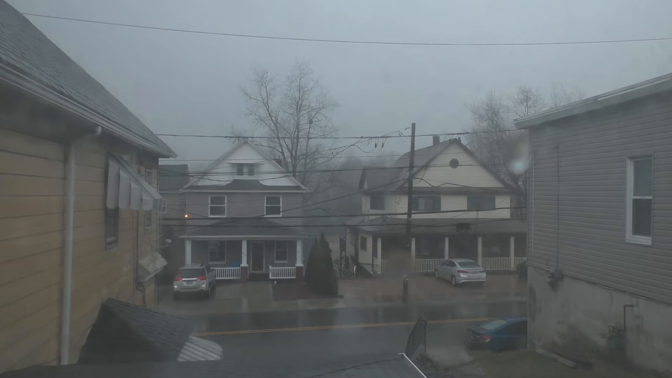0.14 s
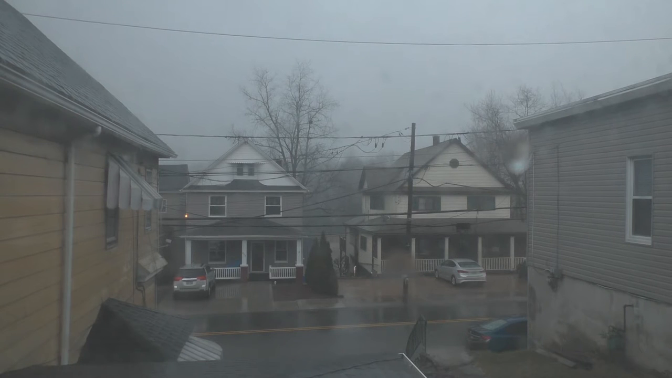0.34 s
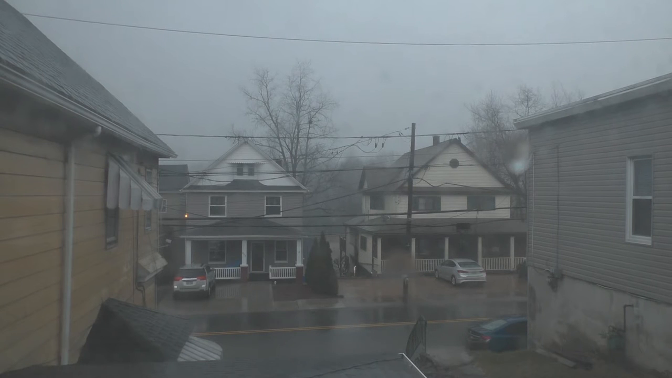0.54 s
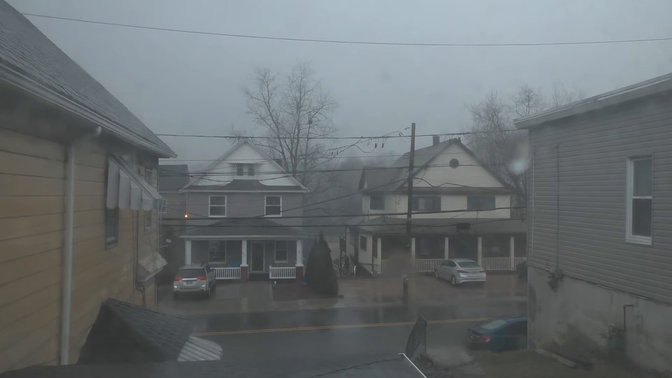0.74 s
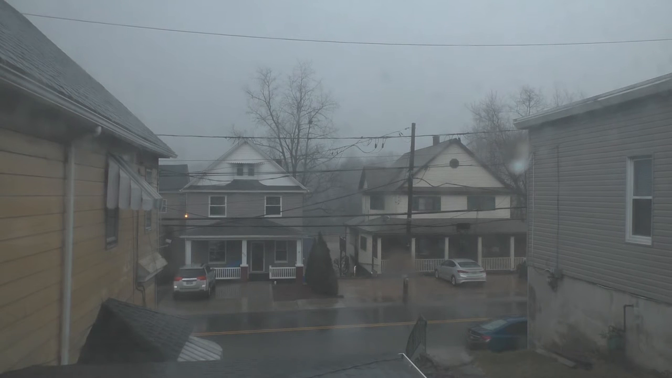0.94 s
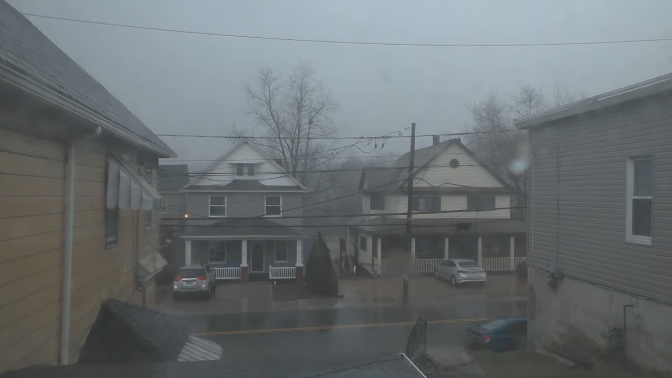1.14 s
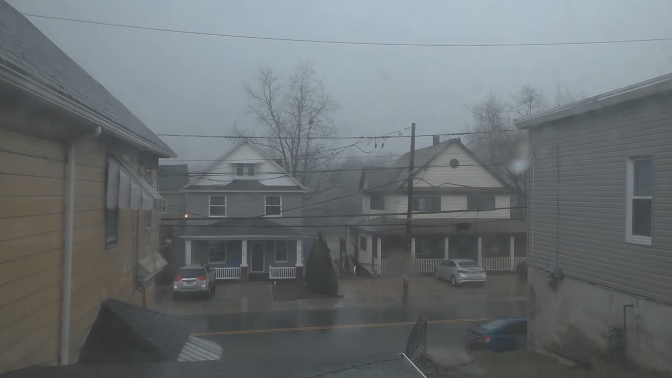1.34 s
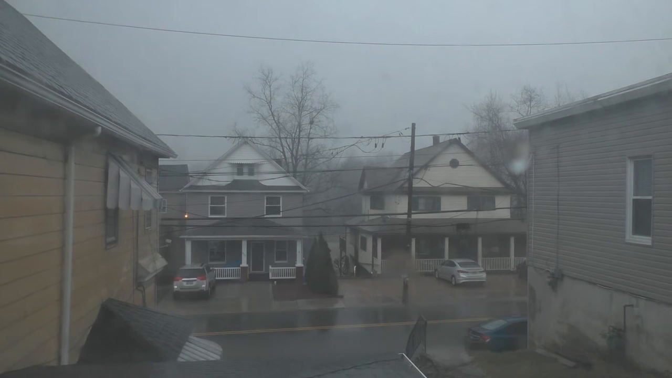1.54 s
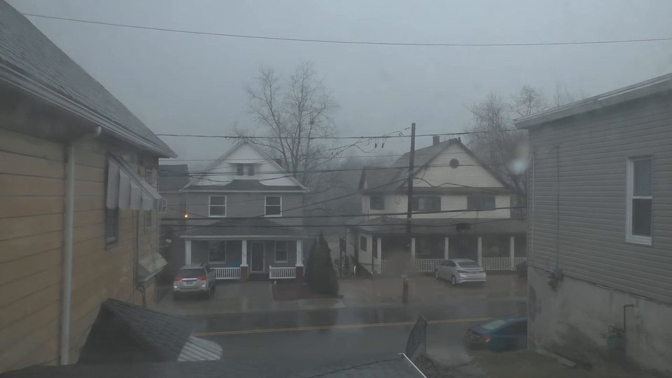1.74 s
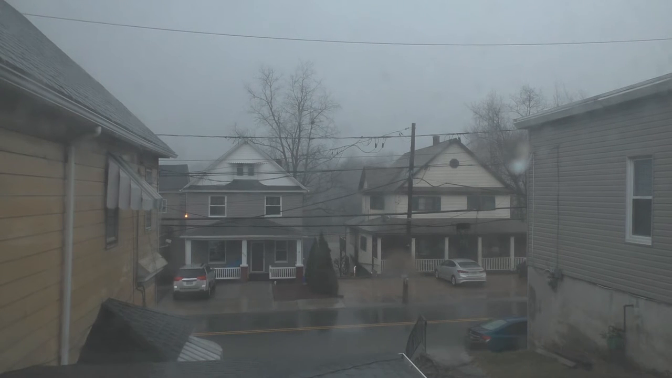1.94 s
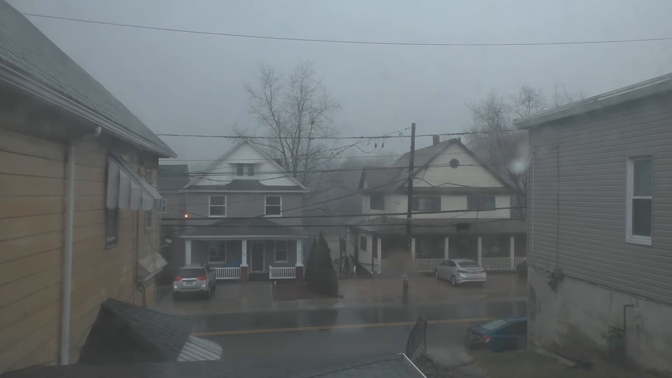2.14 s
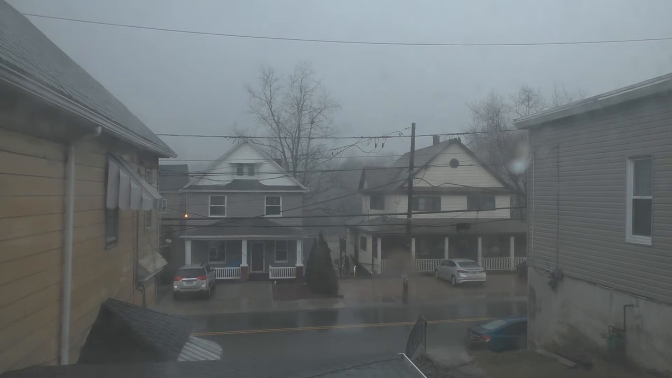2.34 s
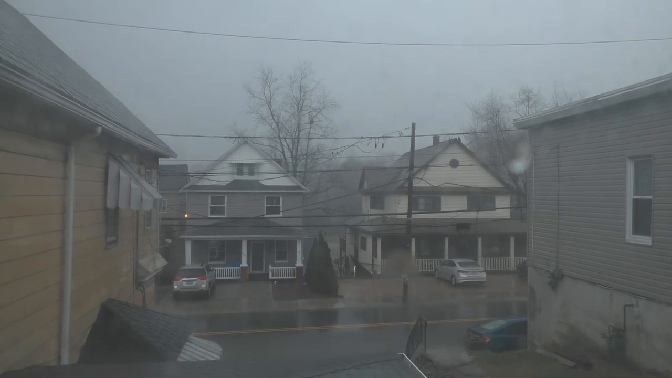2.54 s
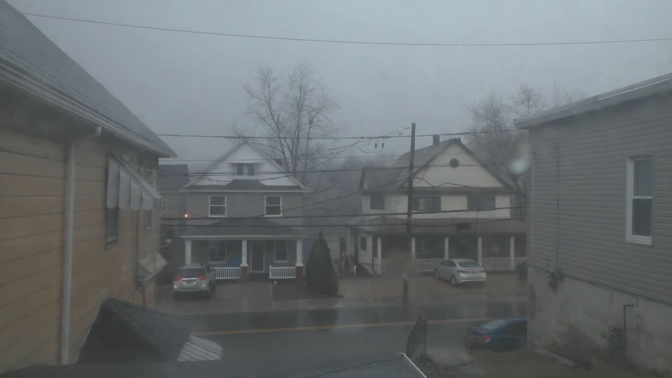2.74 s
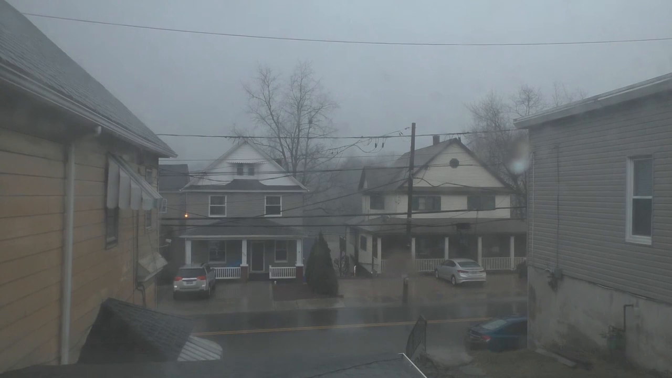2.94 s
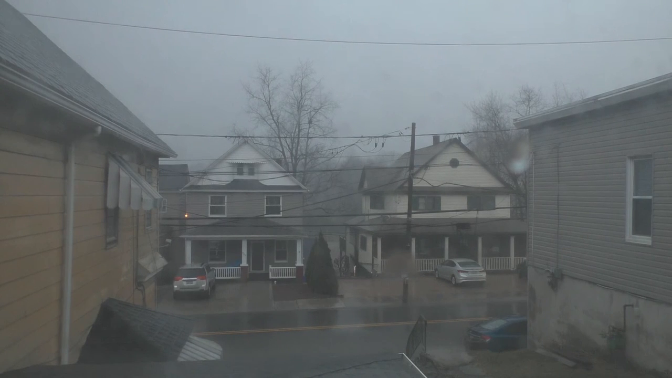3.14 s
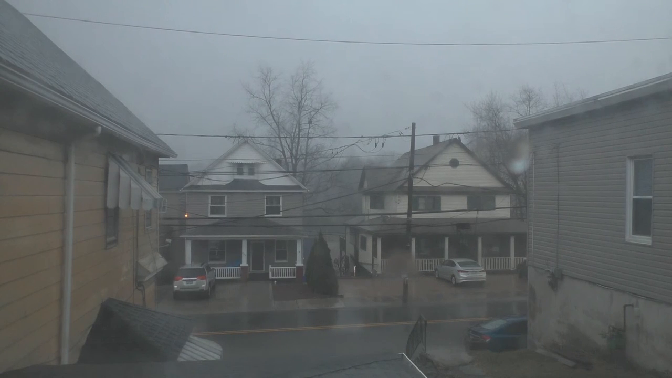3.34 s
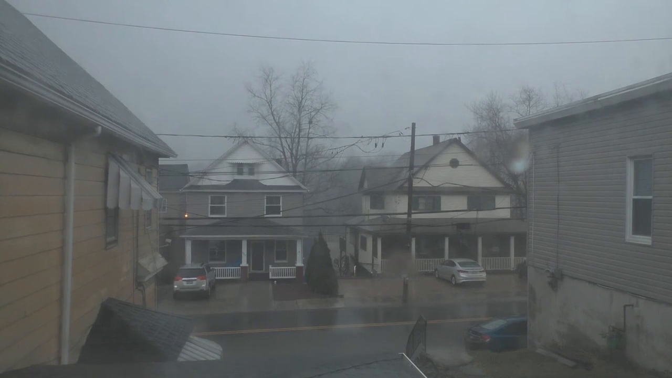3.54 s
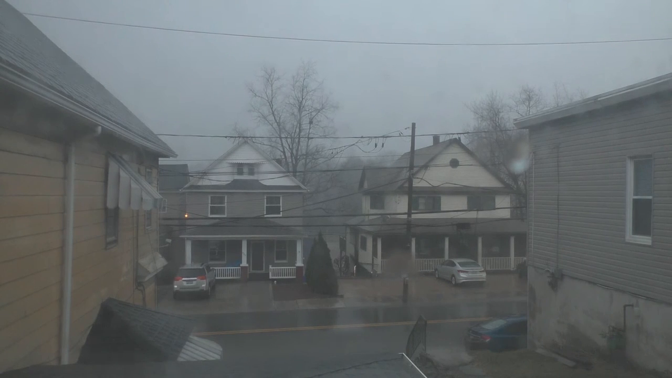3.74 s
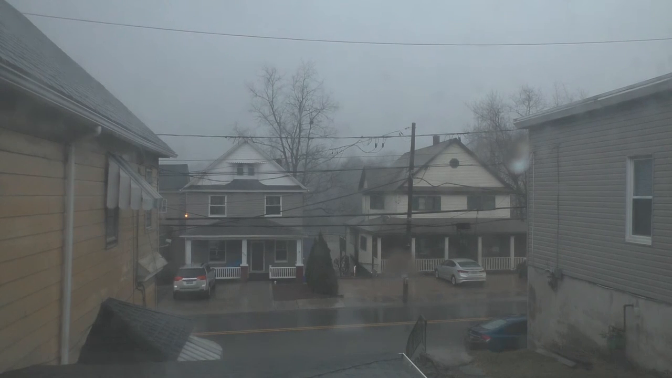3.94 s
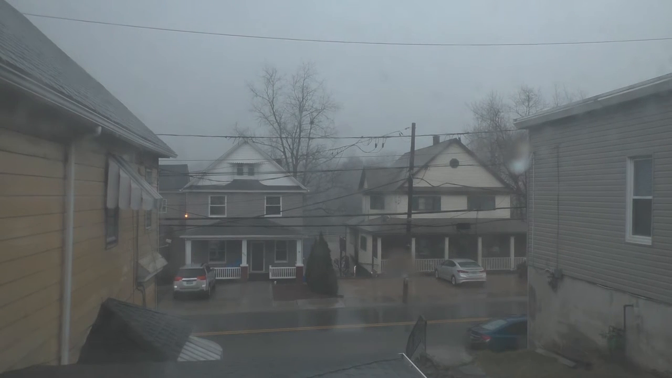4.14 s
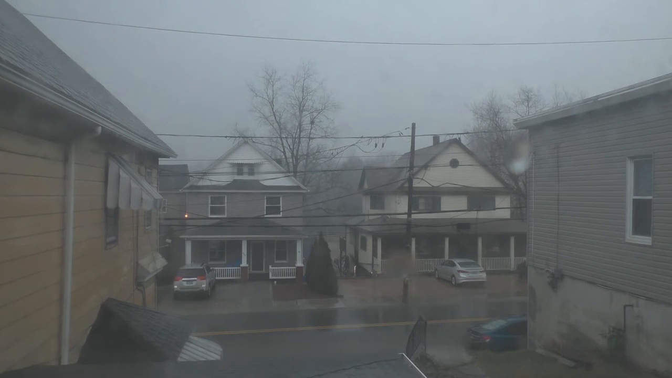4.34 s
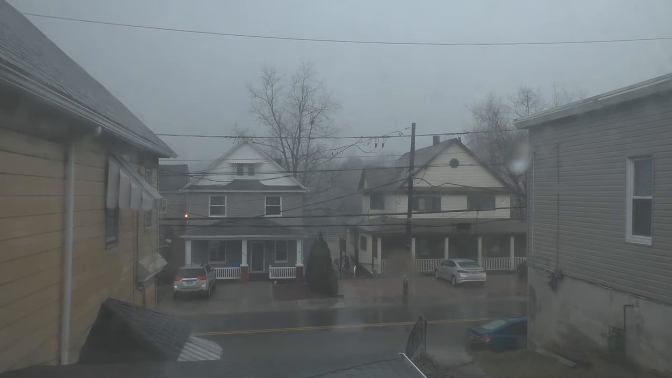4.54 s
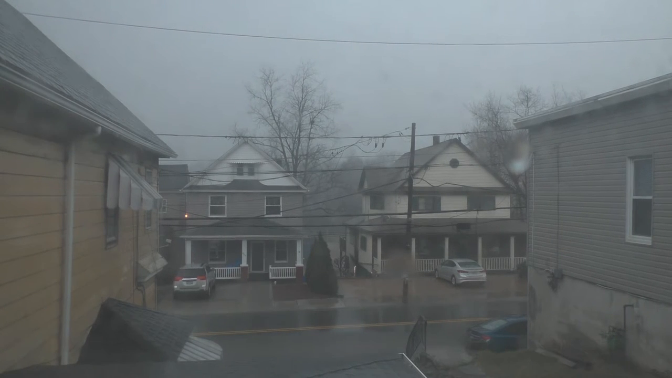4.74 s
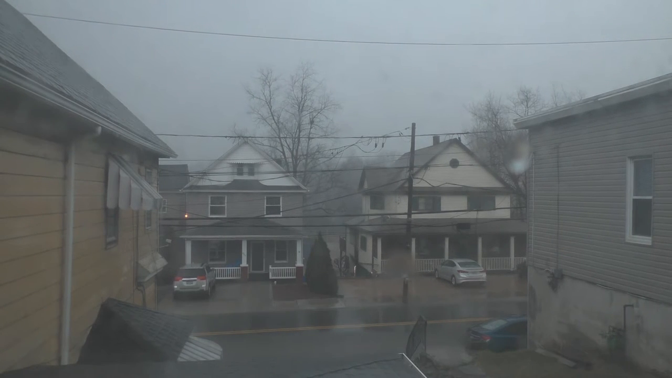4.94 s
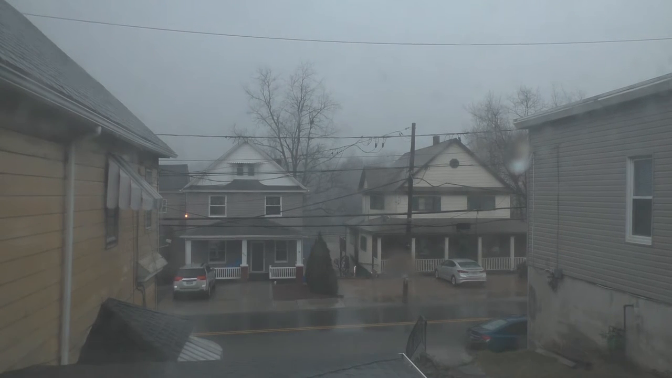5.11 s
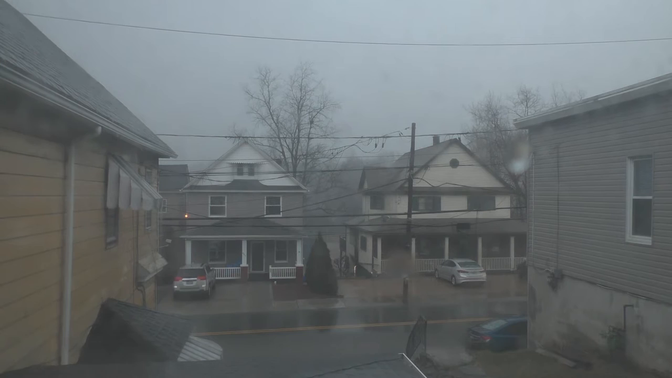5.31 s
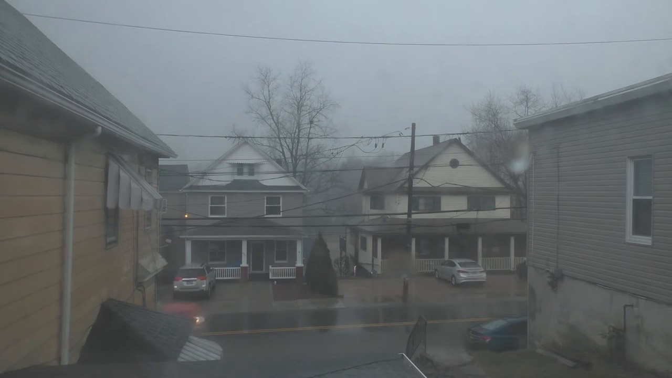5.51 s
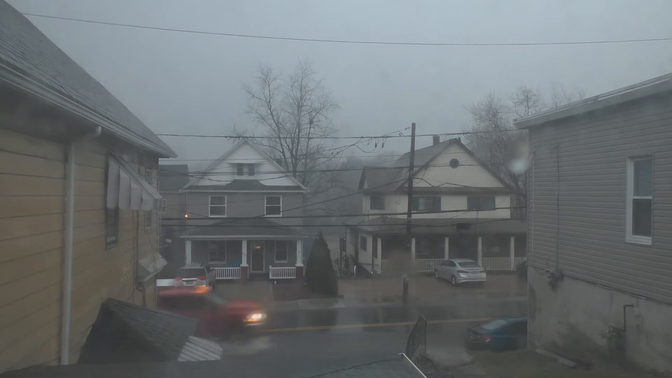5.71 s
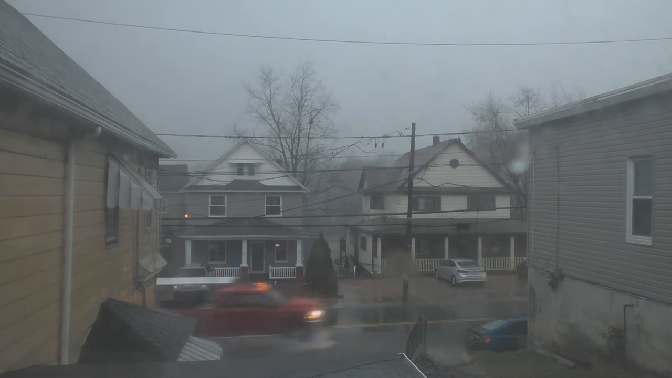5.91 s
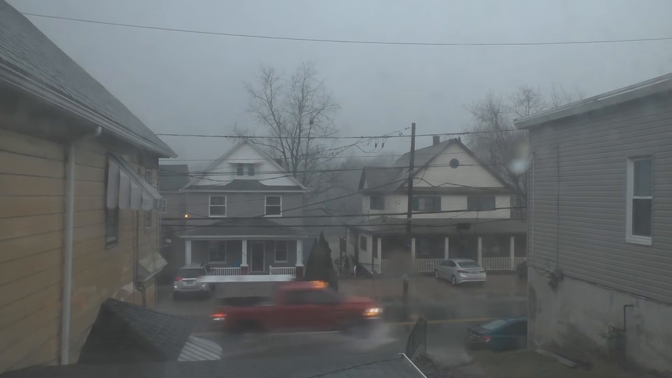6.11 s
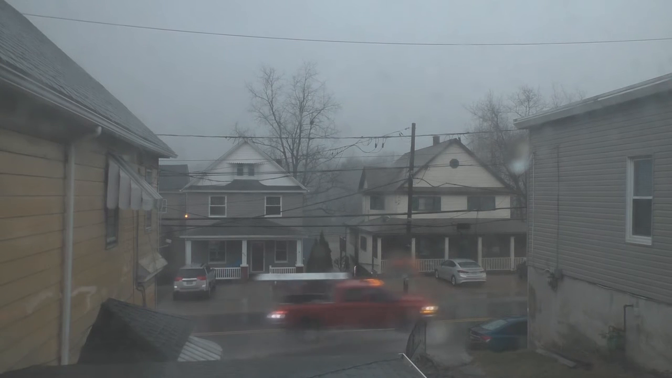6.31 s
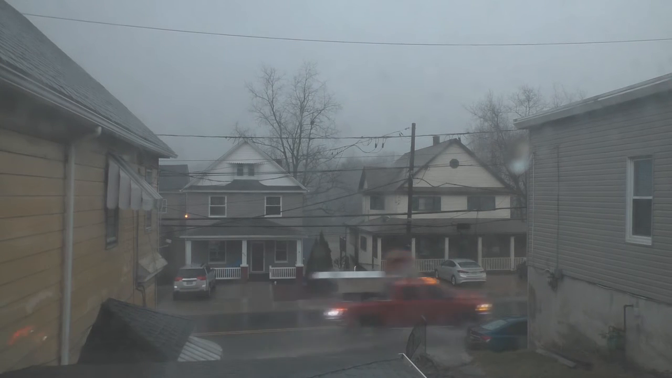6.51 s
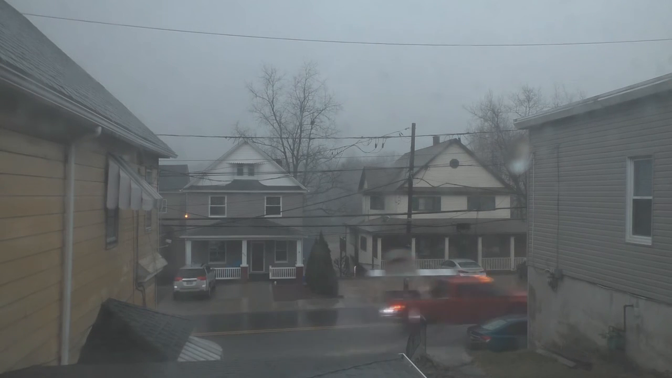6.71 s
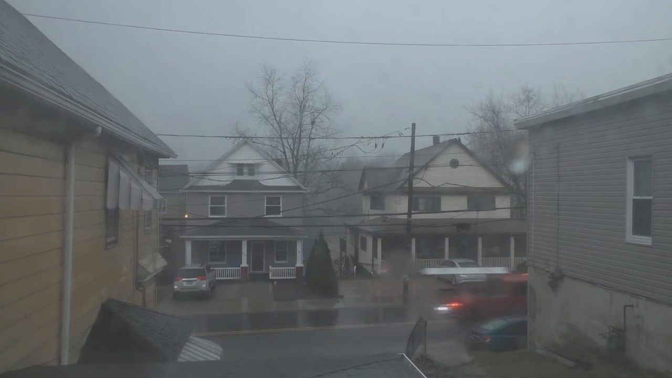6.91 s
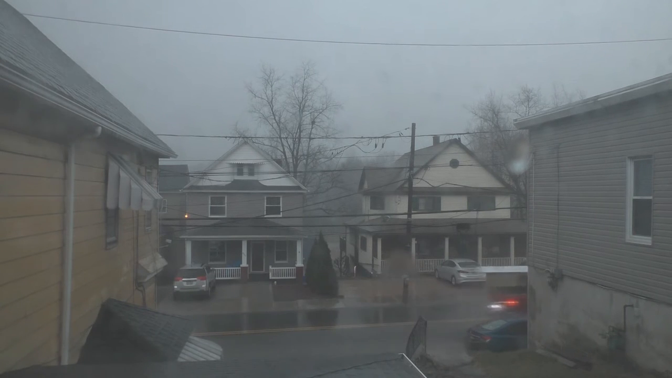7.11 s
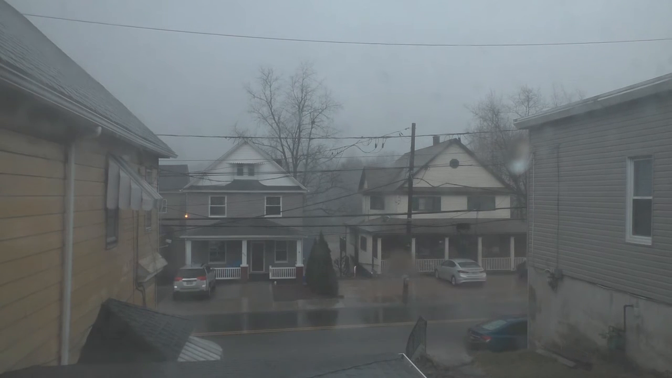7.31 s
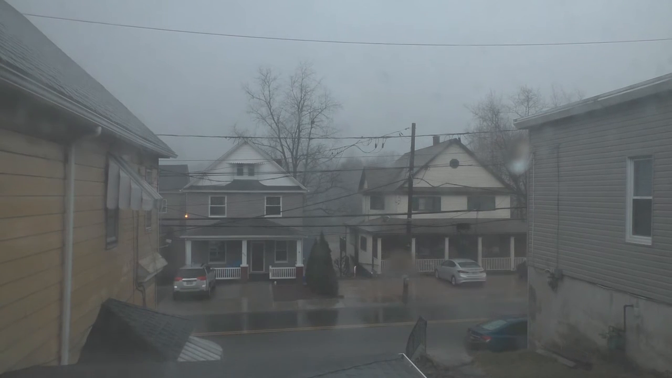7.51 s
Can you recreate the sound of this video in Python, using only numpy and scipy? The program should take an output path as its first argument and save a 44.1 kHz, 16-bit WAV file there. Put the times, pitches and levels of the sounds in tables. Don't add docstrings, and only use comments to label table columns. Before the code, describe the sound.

Heard from an upper window in steady rain, with drops plinking on sill and gutter. A distant pickup's low, rough engine drone swells and fades off the house fronts, slowly growing. After about five seconds it rounds into view with small tyre squeaks, spray hiss and a strong growl, a loose panel rattling metallically as it crosses. It ends still close, with a hollow exhaust note. Stereo, fixed position.

```python
import sys
import numpy as np
from scipy import signal
from scipy.fft import rfft, irfft, next_fast_len
from scipy.io import wavfile
from scipy.ndimage import uniform_filter1d

SR = 44100
rng = np.random.default_rng(int(sys.argv[2]) if len(sys.argv) > 2 else 0)


def log_audio(samples):
    frames = np.atleast_2d(samples).T
    limited = np.clip(frames, -1, 1)
    pcm = np.round(limited * 32767).astype(np.int16)
    wavfile.write(sys.argv[1], SR, pcm)


def nominal_scale(level):
    x = np.asarray(level, float) / 20
    return 10 ** x


N = 333396

# order, level re engine/dB
STRONG_ORDERS = [(6, 4.5), (9, 3.5), (10, 0.5), (11, -1.5), (12, 5), (13, 4.5), (15, -5), (17, -10),
                 (19, -12.5), (21, -12), (14, -8.5), (16, -14), (18, -13), (20, -12.5), (22, -15),
                 (23, -17.5), (26, -19)]


def evened(x):
    return x / np.sqrt(np.mean(x ** 2) + 1e-20)


def read(points, hz):
    f, value = np.transpose(points)
    return np.interp(np.log(hz + 1), np.log(f + 1), value)


def curves(rows, t):
    s, *columns = np.transpose(rows)
    return [np.interp(t, s, c) for c in columns]


def drift(t, top_hz):
    hz = np.geomspace(top_hz / 10, top_hz, num=12)
    return evened(sum(np.sin(2 * np.pi * (f * t + rng.random())) / np.sqrt(f) for f in hz))


def swell(t, middle_s, length_s):
    return np.cos(np.pi * np.clip((t - middle_s) / length_s, -.5, .5)) ** 2


def add_at(out, s, sound):
    start = round(s * SR)
    out[..., start:start + sound.shape[-1]] += sound


def resonate(x, hz, width_hz):
    turn = np.exp(2j * np.pi * np.cumsum(hz * np.ones(len(x))) / SR)
    r = np.exp(-np.pi * width_hz / SR)
    return 2 * (turn * signal.lfilter([1 - r], [1, -r], x / turn)).real


def narrowed(x, hz, width_hz):
    return evened(resonate(resonate(x, hz, width_hz), hz, width_hz))


def band(rows, db, hz, width_hz):
    t, out = np.arange(N) / SR, np.zeros(N)
    fade = np.clip(np.minimum(t - rows[0][0], rows[-1][0] + 0.08 - t) / 0.08, 0, 1)
    on = fade > 0
    out[on] = narrowed(rng.standard_normal(on.sum()), hz[on], width_hz)
    return nominal_scale(db) * fade * out


def hiss(size, field_db, patchy_db, flicker_db, streak_db, focus=1):
    # f/Hz, likeness (-1 to 1)
    likeness = [(40, 0.42), (90, 1), (250, 0.78), (600, 0.54), (850, -0.22), (1050, -0.067), (1400, 0.21),
                (1900, 0.072), (2300, 0.04), (2950, 0.48), (3480, 0.27), (4300, 0.086), (5000, 0.37),
                (7000, 0.94), (10000, 0.45), (15000, 0.29)]
    # f/Hz, phase/rad
    ahead = [(1200, -0.14), (1420, -0.5), (1900, 0.14), (2300, -1.2), (2950, 2), (3500, 0.44), (4100, 0)]
    hop = size // 4
    frames, hz = N // hop + 5, np.fft.rfftfreq(size, 1 / SR)[:, None]
    noise = rng.standard_normal((6, frames, len(hz)), dtype=np.float32)
    a, b, c, d, patches, streaks = noise.transpose(0, 2, 1)
    patches = evened(uniform_filter1d(uniform_filter1d(patches, size=10, axis=0), size=20, axis=1))
    streaks = evened(uniform_filter1d(streaks, size=26, axis=1))
    flicker = evened(uniform_filter1d(rng.standard_normal(frames), size=8))
    flicker = flicker * np.clip(hz / 7000, 0, 1) * np.clip((16000 - hz) / 7000, .4, 1)
    same = np.clip(focus * read(likeness, hz), -1, 1)
    left = a + 1j * b
    right = same * np.exp(1j * read(ahead, hz)) * left + np.sqrt(1 - same ** 2) * (c + 1j * d)
    z = np.array([left, right])
    chance_db = patchy_db * patches + streak_db * streaks + flicker_db * flicker
    z *= nominal_scale(field_db(hz, np.arange(frames) * hop / SR) + chance_db)
    return signal.istft(z, nperseg=size, noverlap=size - hop)[1][:, :N]


def rain():
    # f/Hz, density/dB per Hz
    rain_spectrum = [(240, -40), (400, 9), (633, -26), (988, -23), (1030, -11), (1210, -12), (1560, -34),
                     (1710, -13.5), (5090, -22.5), (7570, -25.5), (15600, -28)]

    def field_db(hz, s):
        return read(rain_spectrum, hz) + 0.18 * drift(s, 2.6)

    wash = evened(hiss(size=512, field_db=field_db, patchy_db=1.5, flicker_db=0.0, streak_db=1.0))
    t, patter = np.arange(300) / SR, np.zeros((2, N))
    count = 45 * N // SR
    for hz in np.geomspace(1500, 10500, num=14):
        grain = np.sin(2 * np.pi * hz * t) * np.exp(-t * hz / 4.6) * nominal_scale(read(rain_spectrum, hz)) * hz
        size = np.zeros((2, N))
        size_db = 4.4 * np.minimum(rng.exponential(1, (2, count)), 4)
        np.put_along_axis(size, rng.integers(0, N, (2, count)), nominal_scale(size_db), axis=1)
        patter += signal.oaconvolve(size, grain[None], axes=1)[:, :N]
    return nominal_scale(-53.5) * (wash + nominal_scale(-14.0) * evened(patter + 0.5 * patter[::-1]))


def ticks():
    # t/s, peak level/dB, f/Hz
    tick_drops = [(.8066, -47, 4050), (2.1026, -42, 2450), (2.3715, -42, 4000), (2.378, -44, 5300),
                  (2.4927, -41, 3460), (2.8818, -41, 2550), (2.921, -42, 4100), (3.0131, -46, 2100),
                  (3.409, -47, 5650), (3.6017, -43, 2240), (3.8801, -42, 2370), (4.2597, -45, 3600)]
    t60_s = 0.041
    t, out = np.arange(2600) / SR, np.zeros(N + 2600)
    for s, db, hz in tick_drops:
        note = np.sin(2 * np.pi * hz * t * (1 + 1.5 * t))
        add_at(out, s, nominal_scale(db - 60 * t / t60_s) * np.minimum(t / .002, 1) * note)
    return out[:N]


def drops():
    # t/s, peak level/dB, f/Hz
    near_drops = [(0.3025, -37, 4990), (0.5394, -43, 3800), (1.3894, -44, 5370), (1.5894, -37, 4820),
                  (1.7429, -42, 3890), (1.8794, -46, 4080), (2.3723, -33, 4700), (2.882, -32, 3550),
                  (3.4094, -39, 5680), (3.879, -35, 3800), (4.2592, -34, 3960), (4.5994, -40, 5320),
                  (4.9891, -33, 5300), (5.28, -35, 4800), (5.4694, -37, 5570), (5.658, -30, 3760),
                  (7.241, -29, 4200)]
    t, out = np.arange(2600) / SR, np.zeros((2, N + 2600))
    for s, db, hz in near_drops:
        plink = narrowed(rng.standard_normal(len(t)), hz, 3200)
        add_at(out, s, plink * nominal_scale(db - 11.5 - 60 * t / 0.11) * np.minimum(t / 0.0015, 1))
    return out[:, :N]


def splashes():
    # t/s, peak level/dB
    near_splashes = [(0.3641, -43.5), (0.9163, -47), (1.0694, -49), (1.3478, -47), (1.4596, -42),
                     (1.5894, -49), (2.2694, -42), (2.3594, -49), (2.4894, -45), (2.8794, -48),
                     (3.0494, -47), (3.1193, -43), (3.4594, -46), (3.69, -44), (3.8794, -49), (4.383, -43),
                     (5.0, -43), (5.2894, -43), (5.6594, -45), (5.9794, -46), (7.2994, -45), (7.5194, -44)]
    t, out = np.arange(2600) / SR, np.zeros((2, N + 2600))
    for s, db in near_splashes:
        puff, other = rng.standard_normal((2, len(t)))
        splash = np.array([narrowed(v, 7000, 6500) for v in (puff, 0.6 * puff + 0.81 * other)])
        add_at(out, s, splash * nominal_scale(db - 7.5 - 60 * t / 0.11) * np.minimum(t / 0.0032, 1))
    return out[:, :N]


def tyres():
    # f/Hz, density/dB per Hz
    spray_spectrum = [(180, -27), (300, -7.5), (453, -19), (581, -15), (822, -21), (1490, -19.5),
                      (2530, -22.5), (2980, -23.5), (3400, -25.5), (4430, -28.5), (4980, -29), (14600, -52),
                      (15600, -84)]
    # t/s, level/dB
    spray_level = [(0, -56), (.45, -57), (1.2, -55), (2.1, -52), (4.9, -53), (5.3, -50.5), (5.45, -48.5),
                   (5.6, -44), (5.85, -41.5), (6.02, -41.5), (6.2, -46), (6.4, -43.5), (6.6, -44),
                   (6.85, -45), (7.1, -43.5), (7.25, -45.5), (7.56, -46)]
    # middle t/s, level/dB, length/s
    roars = [
        (4.3, 3, 1.2),
        (6.64, 4.5, 0.89),
        (7.265, 5.5, 0.87),
    ]

    def field_db(hz, s):
        level_db = curves(spray_level, s)[0]
        rise_db = level_db + 52
        front_db = 4.5 * swell(s, 5.46, 0.49)
        roar_db = -2 + sum(db * swell(s, middle_s, length_s) for middle_s, db, length_s in roars)
        high = np.clip((hz - 6000) / 1500, 0, 1)
        middle = np.clip((hz - 3000) / 1400, 0, 1) - high
        low = np.clip((1050 - hz) / 300, 0, 1)
        sizzle_db = 2.5 + front_db - (1 - 0.73) * rise_db
        fizz_db = 1 + .6 * front_db - (1 - 0.6) * rise_db
        return read(spray_spectrum, hz) + level_db + middle * sizzle_db + high * fizz_db + low * roar_db

    return nominal_scale(15) * hiss(size=512, field_db=field_db, patchy_db=-0.02, flicker_db=0.7, streak_db=1.2, focus=1.2)


def wheel_arches():
    # middle t/s, peak level/dB, length/s, centre f/Hz
    swishes = [
        (5.46, -58, .2, 5100),
        (6.306, -49, .2, 3800),
        (6.46, -47, .14, 3750),
        (6.605, -45, .12, 4080),
        (6.71, -41, 0.2, 3950),
        (6.97, -45, 0.16, 3860),
        (7.09, -47.5, .25, 3940),
    ]
    t, out = np.arange(SR // 2) / SR, np.zeros(N)
    for s, db, length_s, hz in swishes:
        water = narrowed(rng.standard_normal(len(t)), hz, 880)
        add_at(out, s - .25, nominal_scale(db) * swell(t, .25, length_s) * water)
    return out


def exhaust_pipe():
    # t/s, f/Hz, level/dB
    pipe_note = [(7.08, 650, -58), (7.26, 636, -52), (7.31, 645, -38), (7.38, 655, -37), (7.42, 651, -44),
                 (7.46, 654, -41), (7.56, 650, -42)]
    t = np.arange(N) / SR
    hz, db = curves(pipe_note, t)
    tone = nominal_scale(db + 1) * (t > pipe_note[0][0]) * np.sin(2 * np.pi * np.cumsum(hz) / SR)
    return band(pipe_note, db - 14, hz, 40) + tone


def whines():
    # t/s, f/Hz, level/dB
    glides = [
        [(5.08, 1090, -59), (5.2, 1060, -57), (5.36, 1070, -56)],
        [(5.38, 1450, -58), (5.5, 1490, -57), (5.6, 1540, -55), (5.68, 1570, -59)],
        [(6.3, 1550, -48), (6.5, 1620, -58), (6.85, 1704, -56), (7.05, 1616, -49)],
        [(5.75, 2560, -55), (6.02, 2520, -54)],
        [(5.76, 3400, -55), (6.08, 3400, -57)],
    ]
    t, out = np.arange(N) / SR, np.zeros(N)
    for rows in glides:
        hz, db = curves(rows, t)
        out += band(rows, db, hz, 76)
    return out


def loose_panel():
    # t/s, peak level/dB, f/Hz, t60/s
    shakes = [(6.419, -26, 1630, .1), (6.435, -23, 1635, 0.1), (6.461, -25, 1625, .1),
              (6.496, -19, 1660, 0.07), (6.551, -24, 1605, 0.08), (6.567, -18.5, 1655, 0.09),
              (6.618, -27, 1660, .08), (6.675, -26, 1620, .1), (6.706, -16.5, 1650, 0.075),
              (6.777, -16, 1680, 0.075), (6.806, -27, 1640, 0.2), (6.845, -21, 1720, 0.08),
              (6.912, -24, 1660, 0.07)]
    t, out = np.arange(5000) / SR, np.zeros(N)
    rise = np.sin(np.pi / 2 * np.minimum(t / 0.01, 1)) ** 2
    for s, db, hz, t60_s in shakes:
        modes = np.sin(2 * np.pi * hz * t) + 0.54 * np.sin(2 * np.pi * 1854 * t)
        buzz = 0.34 * narrowed(rng.standard_normal(len(t)), hz, 390)
        add_at(out, s, nominal_scale(db - 6.5 - 60 * t / t60_s) * rise * (modes + buzz))
    return out


def tread_squeaks():
    # t/s, peak level/dB, f/Hz, t60/s
    squeaks = [
        (5.438, -32, 1440, 0.073),
        (5.484, -34, 1480, .08),
        (5.54, -35, 1420, .1),
        (5.572, -30, 1475, .08),
        (5.586, -32, 1536, 0.11),
        (5.648, -38, 1550, 0.091),
    ]
    t, out = np.arange(5000) / SR, np.zeros(N)
    for s, db, hz, t60_s in squeaks:
        note = np.sin(2 * np.pi * hz * t * (1 + 0.6 * t))
        add_at(out, s, nominal_scale(db - 60 * t / t60_s) * np.minimum(t / 0.012, 1) * note)
    return out


def truck_body():
    out = wheel_arches() + exhaust_pipe() + whines() + loose_panel() + tread_squeaks()
    late = np.roll(out, shift=37)
    return np.array([out + 0.2 * late, out - 0.064 * late])


def echoes(rows, order, t):
    return sum(nominal_scale(db) * swell(t, s, length_s) for s, o, db, length_s in rows if round(o) == order)


def cancelled_db(rows, order, t):
    return sum(-16.5 * swell(t, s, length_s) for s, o, length_s in rows if round(o) == order)


def order_levels(t):
    # t/s, level/dB
    nearness = [(0.0, -53.5), (1.0, -53), (2.0, -50.5), (3.0, -51), (4.0, -45.5), (4.8, -47), (5.4, -51),
                (5.8, -40.5), (6.2, -32.5), (6.6, -32), (7.0, -33.5), (7.6, -34)]
    # middle t/s, order, peak level/dB, length/s
    far_echoes = [(0.147, 10.0, -43, 0.26), (0.32, 10.0, -49.5, 0.93), (0.417, 12.0, -51, 0.41),
                  (0.633, 6.0, -52.5, 0.92), (1.036, 13.0, -45.5, 0.31), (1.138, 6.0, -42, 1.0),
                  (1.48, 19.0, -55.5, 1.0), (1.548, 6.0, -47.5, 0.49), (1.675, 12.0, -50, 0.4),
                  (1.72, 9.0, -51, 1), (2.268, 13.0, -45.5, 0.41), (2.273, 10.0, -36.5, 0.46),
                  (2.458, 12.0, -44, 0.41), (2.65, 10.0, -39, 0.44), (2.963, 9.0, -39.5, 0.4),
                  (2.96, 10.0, -42, 0.58), (2.977, 13.0, -41, 0.27), (3.087, 10.0, -36, 0.24),
                  (3.225, 12.0, -39.5, 0.4), (3.426, 6.0, -37, 0.78), (3.45, 13.0, -40, 0.48),
                  (3.495, 9.0, -37, 1), (3.585, 10.0, -38, 0.26), (4.027, 6.0, -35.5, 0.25),
                  (4.043, 9.0, -45, 0.5), (4.09, 10.0, -34, 0.9), (4.14, 6.0, -38, 1.0),
                  (4.225, 15.0, -45.5, 1.0), (.05, 6, -52, .3), (1.3, 10, -47, 0.65), (2.35, 6, -50, 0.36),
                  (2.5, 9, -46, .3), (3.6, 10, -43, 0.54), (.3, 17, -55, .7), (2.6, 17, -56, .35),
                  (3.2, 19, -53, 0.36), (1.1, 19, -59, .3)]
    # middle t/s, order, peak level/dB, length/s
    near_echoes = [(4.49, 10.0, -33, 0.1), (4.613, 13.0, -38, 0.15), (4.657, 6.0, -44.5, 1.0),
                   (4.68, 10.0, -38.5, 0.95), (5.04, 9.0, -46, 0.44), (5.25, 10.0, -38.5, 0.6),
                   (5.28, 11.0, -39.5, 0.93), (5.327, 12.0, -32.5, 0.83), (5.42, 9.0, -42, 0.58),
                   (5.648, 9.0, -27.5, 0.5), (5.76, 15.0, -39, 0.26), (5.815, 12.0, -31.5, 0.17),
                   (6.074, 12.0, -22, 0.3), (6.113, 15.0, -23.5, 0.41), (6.234, 9.0, -23.5, 0.28),
                   (6.377, 6.0, -28.5, 0.35), (6.43, 21.0, -40, 1.0), (6.55, 13.0, -37, 0.37),
                   (6.523, 21.0, -31, 0.2), (6.602, 19.0, -40, 0.6), (6.797, 12.0, -31, 0.43),
                   (6.784, 17.0, -31.5, 0.89), (6.92, 13.0, -40, 0.91), (6.94, 11.0, -34, 1),
                   (7.059, 21.0, -37, 0.49), (7.3, 6.0, -43, 0.23), (7.38, 9.0, -35.5, 0.84),
                   (7.44, 19.0, -33, 0.94), (7.46, 11.0, -43, 0.75), (6.0, 23, -44, .25),
                   (4.9, 11, -43, 0.34), (5.396, 13, -38.5, 0.32), (5.5, 6, -42, .25),
                   (5.55, 14, -45, 0.32), (6.08, 11, -35, .2), (6.35, 11, -28, .3), (6.33, 10, -37, .3),
                   (6.4, 17, -33, .2), (6.6, 16, -33, .2), (6.95, 19, -40, 0.44), (7.1, 9, -37, 0.27),
                   (7.27, 13, -36, .3), (7.4, 15, -46, .2), (7.55, 9, -32, .25), (7.1, 23, -45, .35),
                   (6.8, 29, -46, .3)]
    # middle t/s, order, peak level/dB, length/s
    upper_echoes = [(.8, 18, -55, 1.0), (2.3, 17, -54, 0.46), (2.3, 18, -46.5, .35),
                    (2.797, 18, -46.5, 0.77), (2.9, 17, -41.5, 0.24), (2.95, 19, -49.5, .5),
                    (2.9, 21, -53, 0.47), (3.5, 21, -52.5, 0.98), (3.6, 17, -53, 0.57),
                    (4.09, 18, -41.5, 0.82), (4.5, 17, -49.5, .9), (4.69, 18, -42.5, 0.19),
                    (5.7, 14, -46, .4), (5.8, 20, -48, 0.41), (5.9, 16, -45, .3), (6.02, 18, -39.5, 0.54),
                    (6.1, 17, -40, .25), (6.097, 20, -37.5, .3), (6.1, 23, -45, 0.33), (6.2, 14, -40, 0.74),
                    (6.3, 16, -42, 0.48), (6.297, 26, -43.5, 0.46), (6.504, 19, -34, 0.49),
                    (6.498, 20, -42, .3), (6.405, 22, -33, .16), (6.59, 22, -33, 0.17),
                    (6.633, 18, -35, .15), (5.983, 23, -46, .2), (6.698, 18, -38, .3), (6.8, 14, -32, 0.64),
                    (6.8, 23, -43, .5), (6.9, 26, -46.5, 0.8), (7.0, 15, -45, .45), (7.097, 22, -41, 0.4),
                    (7.15, 14, -36, 0.44), (7.5, 18, -47, 0.25)]
    # middle t/s, order, length/s
    cancels = [(0.21, 9, 0.49), (0.95, 9, 0.88), (1.7, 10, 0.22), (1.798, 13, 0.32), (2.24, 6, 0.54),
               (2.62, 9, 0.51), (3.02, 12, 0.17), (3.21, 9, 0.34), (3.794, 10, 0.25), (4.36, 10, 0.28),
               (4.895, 13, 0.71), (5.56, 6, 0.33), (5.53, 10, .35), (5.665, 12, 0.22), (5.836, 6, 0.21),
               (6.4, 9, 0.091), (6.053, 13, 0.62), (6.247, 12, 0.26), (6.428, 10, 0.25), (6.645, 12, 0.14),
               (6.655, 6, 0.27), (6.654, 13, 0.11), (6.95, 6, 0.38), (7.26, 13, 0.31), (7.3, 15, 0.59),
               (7.36, 21, 0.56), (7.414, 12, 0.22), (6.6, 6, 0.45), (7.55, 10, 0.27), (.5, 19, 0.83),
               (4.8, 19, .4), (5.1, 21, .4), (5.9, 17, 1), (5.7, 19, .5), (6.8, 17, 0.15), (6.7, 22, .3),
               (8, 15, 0.21), (6.896, 12, 0.16), (6.5, 16, .5), (7.3, 20, .5), (2.02, 6, .3),
               (6.9, 11, 0.1), (6.35, 14, 0.12), (6, 23, .5), (4, 22, 0.48), (4.4, 11, .7), (4.55, 9, 0.43),
               (1.32, 9, .3), (2.57, 15, .7), (2, 15, 0.55), (7.0, 12, .2), (7.25, 18, .6), (5.75, 23, .4),
               (7.55, 14, .2), (5.9, 15, .15)]
    rows, slow = [], np.linspace(0, t[-1], num=800)
    for k, db in STRONG_ORDERS:
        carried_db = 7 * swell(slow, 2.1, 2.8) * (k in (17, 19, 21))
        direct = nominal_scale(curves(nearness, slow)[0] + db + carried_db + 2 * drift(slow, 4))
        joined = echoes([*far_echoes, *near_echoes, *upper_echoes], k, slow)
        level_db = 20 * np.log10(direct + joined) + cancelled_db(cancels, k, slow)
        rows.append(np.interp(t, slow, level_db))
    return np.array(rows)


def engine():
    # t/s, firing cycle f/Hz
    speed = [(0, 15.31), (.5, 15.46), (1, 15.49), (2, 15.59), (2.75, 15.48), (3, 15.4), (3.5, 15.44),
             (3.75, 15.52), (4, 15.75), (4.25, 15.92), (4.5, 15.88), (4.75, 15.55), (5.8, 14.42),
             (6.6, 14.5), (6.8, 14.4), (7, 14.43), (7.2, 14.52), (7.56, 14.6)]
    # order, level re strong orders around/dB
    between = [(5, -35), (7, -22), (8, -11), (24, -11), (25, -14), (27, -3), (28, -13), (29, -2.5)]
    # middle t/s, order, peak level/dB, length/s
    weak_echoes = [(.3, 8, -47, .3), (1.9, 8, -52, .3), (2.5, 7, -54, .3), (2.5, 8, -54, .3),
                   (3.8, 7, -46, .5), (4.45, 8, -40.5, 0.59), (4.5, 7, -45, .3), (5.3, 7, -39, .35),
                   (5.55, 8, -47, .35), (5.9, 8, -41, .35), (5.95, 7, -36, .3), (6.45, 8, -43, .3),
                   (7.1, 8, -41, .5)]
    # middle t/s, order, length/s
    weak_cancels = [
        (6.85, 7, .6),
        (6.75, 8, .3),
        (7.5, 8, .3),
        (6.1, 27, .3),
    ]
    # f/Hz, density/dB per Hz
    rumble_spectrum = [(15, -55), (25, -3), (37, -17), (75, -4), (165, 4.5), (201, -1.5), (241, -11),
                       (284, -4), (330, -17.5), (395, -11.5), (900, -38.5), (1170, -53), (1980, -120)]
    t = np.arange(N // 16 + 1) * 16 / SR
    turn = 2 * np.pi * np.cumsum(curves(speed, t)[0]) * 16 / SR
    strong_db, strong = order_levels(t), np.transpose(STRONG_ORDERS)[0]
    out = np.zeros((2, len(t)))
    for k, db in zip(strong, strong_db):
        wobble = .12 * drift(t, 9) + .6 * drift(t, 1.5)
        lead = np.array([[1], [-1]]) * (0.065 + 0.012 * k * drift(t, 2.01))
        out += nominal_scale(db) * np.sin(k * turn + 2 * np.pi * rng.random() + wobble + lead)
    for k, db in between:
        near = np.exp(-abs(strong - k) / 2)[:, None]
        around_db = uniform_filter1d((near * strong_db).sum(0) / near.sum(), size=500)
        fading_db = 1.6 * drift(t, 7.9) + cancelled_db(weak_cancels, k, t)
        level = nominal_scale(around_db + db + 0.4 + fading_db) + echoes(weak_echoes, k, t)
        out += level * np.sin(k * turn + 2 * np.pi * rng.random() + 0.75 * drift(t, 4))
    orders = signal.resample_poly(out, 16, 1, axis=1)[:, :N]
    slow_db = uniform_filter1d(10 * np.log10(np.mean(nominal_scale(strong_db) ** 2, axis=0)), size=900)

    def field_db(hz, s):
        follows = .52 * np.clip((hz - 50) / 25, .2, 1)
        return read(rumble_spectrum, hz) + follows * (np.interp(s, t, slow_db) + 57.0)

    rumble = evened(hiss(size=4096, field_db=field_db, patchy_db=1.1, flicker_db=0, streak_db=0))
    return np.sqrt(2) * orders + nominal_scale(-36) * rumble


def scene():
    return rain() + ticks() + drops() + splashes() + tyres() + truck_body() + engine()


def low_pass(x):
    return signal.sosfilt(signal.butter(12, 15710, fs=SR, output="sos"), x)


def record(dry):
    # f/Hz, width/Hz, depth/dB
    dips = [(1150, 24, -6.5), (2770, 67, -2.5), (3186, 54, -6), (4560, 230, -2.5), (6800, 1580, -2)]
    size = next_fast_len(N)
    closing = np.minimum(np.arange(N)[::-1] / 130, 1)
    hz = np.fft.rfftfreq(size, 1 / SR)
    dips_db = sum(db * np.exp(-((hz - centre_hz) / width_hz) ** 2) for centre_hz, width_hz, db in dips)
    left_db = np.array([[1], [-1]]) * 0.5 * np.exp(-np.log((hz + 1) / 350) ** 2)
    edge = np.clip((15690 - hz) / 60, 0, 1)
    coloured = rfft(dry * closing, size) * nominal_scale(dips_db + left_db) * edge
    top = irfft(coloured * np.clip((hz - 6000) / 6000, 0, 1), size)[:, :N]
    loss_db = -5.5 * swell(np.arange(N) / SR, 6.87, 1)
    return low_pass(irfft(coloured, size)[:, :N] - (1 - nominal_scale(loss_db)) * top)


dry = scene()
out = record(dry)
log_audio(out)
```